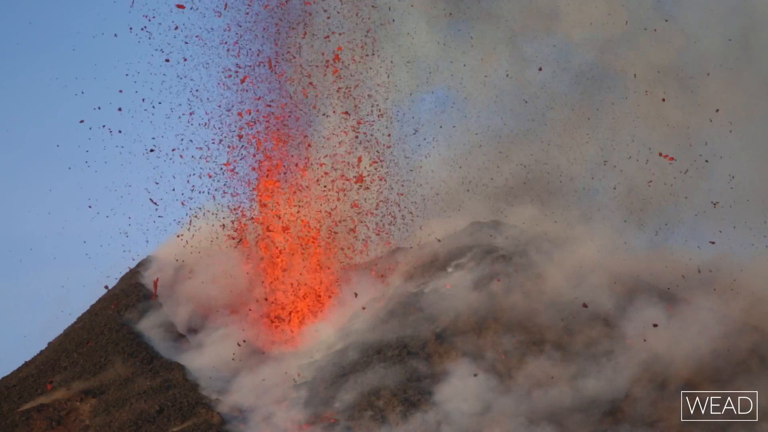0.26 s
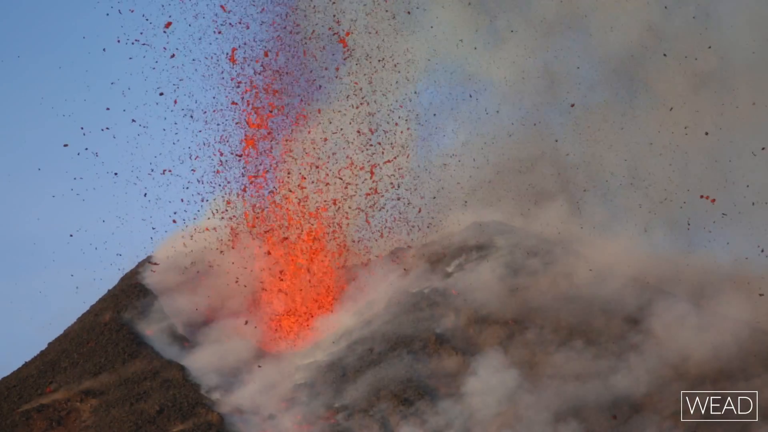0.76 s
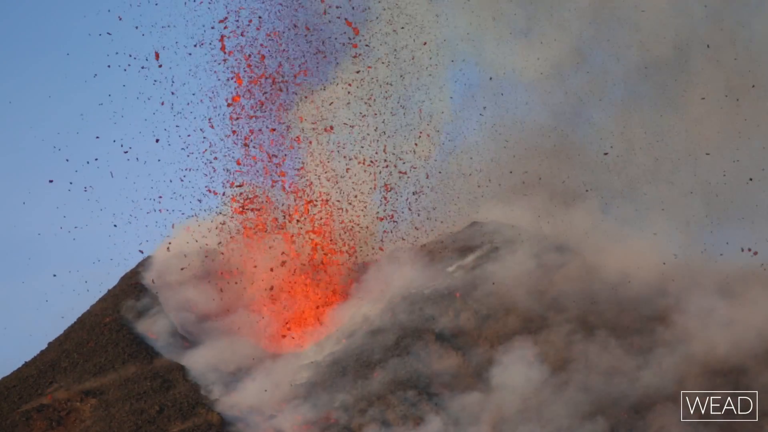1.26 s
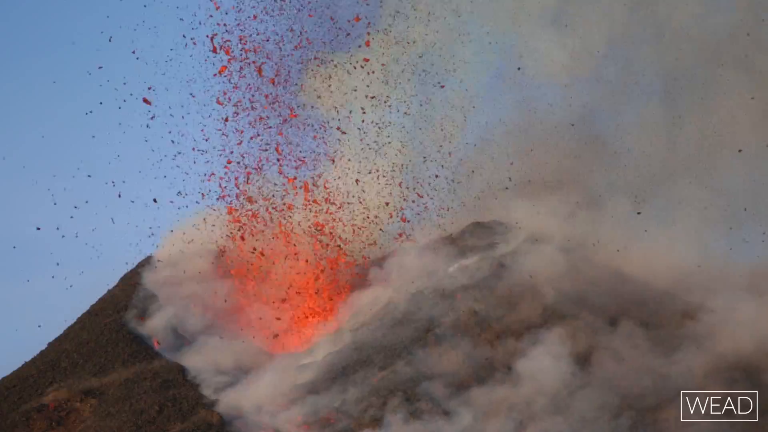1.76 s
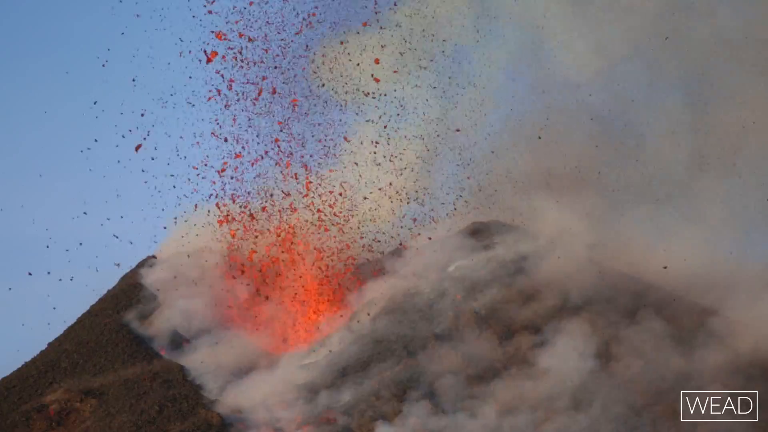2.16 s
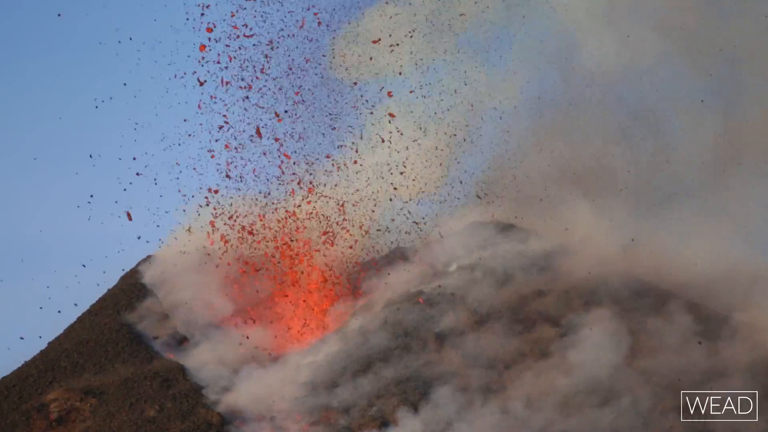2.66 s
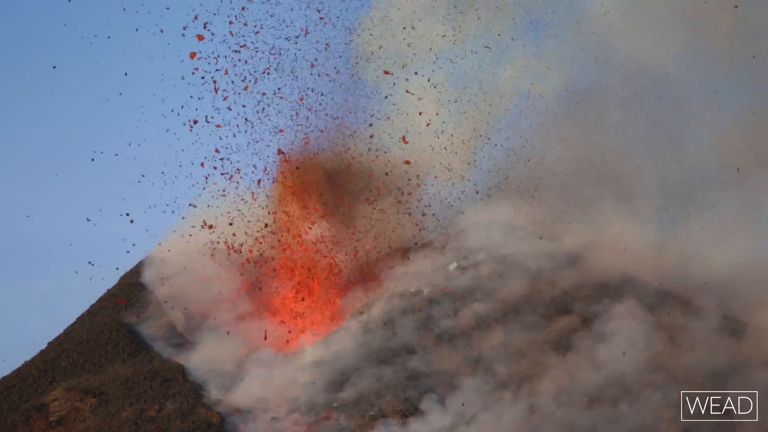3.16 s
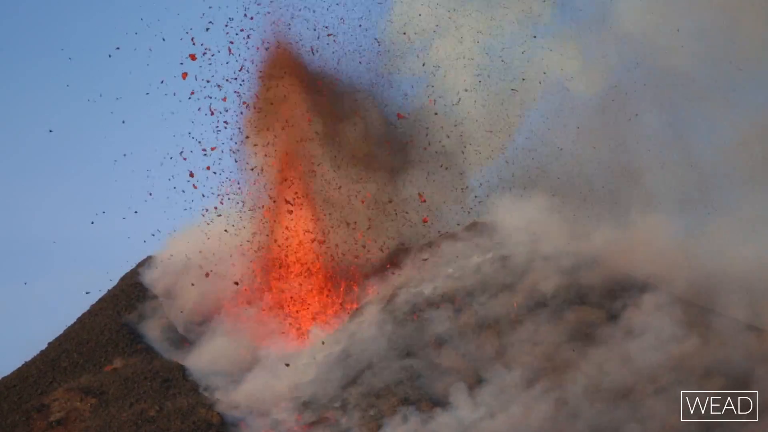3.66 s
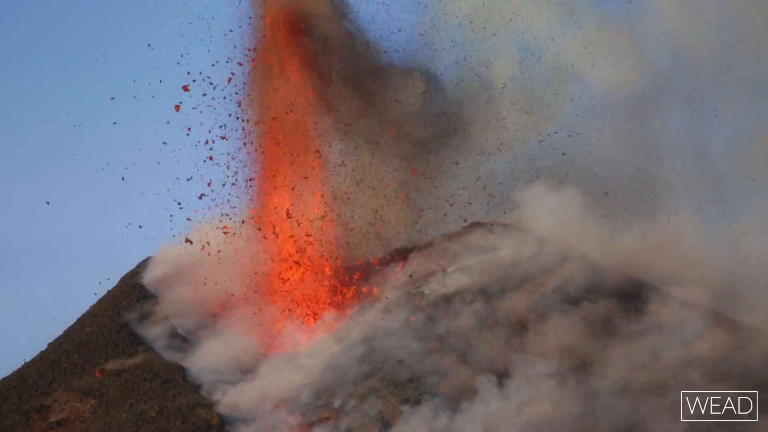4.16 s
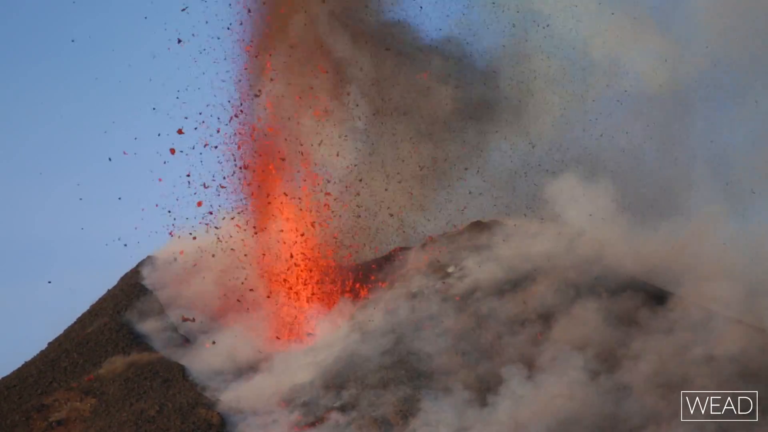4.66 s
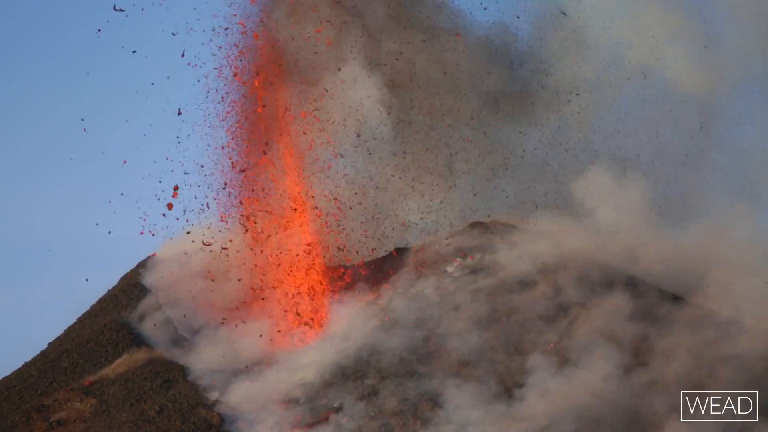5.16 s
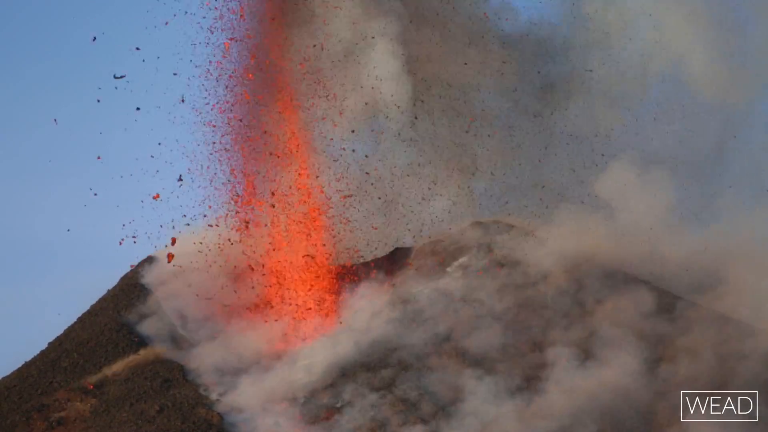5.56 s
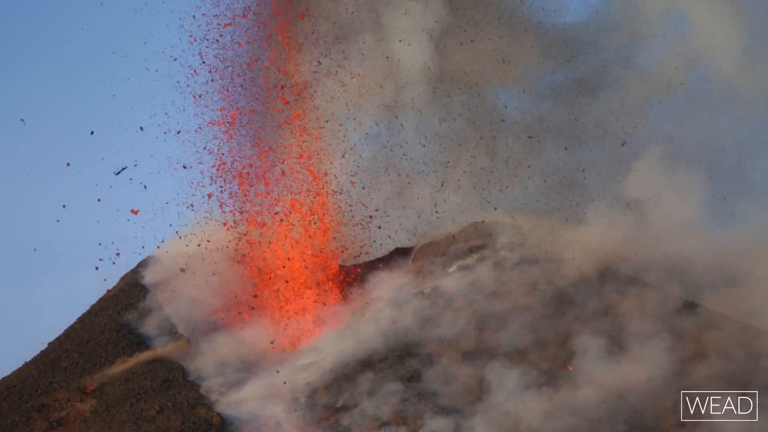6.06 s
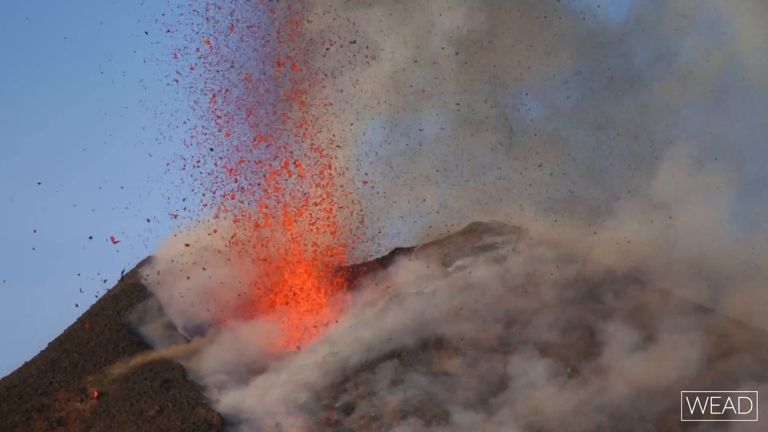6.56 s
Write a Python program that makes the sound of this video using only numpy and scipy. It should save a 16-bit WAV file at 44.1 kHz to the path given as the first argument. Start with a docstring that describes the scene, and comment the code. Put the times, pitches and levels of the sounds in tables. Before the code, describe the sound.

Gas and lava burst from a far crater, quiet booming puffs building to two huge overloaded explosions midway, then fading over deep rumble.

```python
"""Eruption of a volcano's crater

Lava and gas burst from a crater, heard from far across an open mountainside. Gas jets surge as shaped noise:
large eddies boom, small ones roar, and torn lava and ash add spray. Bursting gas slugs add short pressure
swings, and the strongest crests overload the input and crackle. Beneath lie the rumble of the vent, a steady
murmur of air, a thin steady hiss, and a few faint ticks."""
import sys
import numpy as np
from scipy import signal
from scipy.fft import rfft, irfft
from scipy.io import wavfile
from scipy.ndimage import uniform_filter1d

SR = 44100
rng = np.random.default_rng(int(sys.argv[2]) if len(sys.argv) > 2 else 0)


def bounce(signal):
    """Save signal as a 16-bit WAV file at the path given by the first command-line argument."""
    frames = np.transpose(np.atleast_2d(signal))
    limited = np.clip(frames, -1, 1)
    pcm = np.round(limited * 32767).astype(np.int16)
    wavfile.write(sys.argv[1], SR, pcm)


N = 299880
T = np.arange(N) / SR  # time in seconds

# Spectrum of the steady murmur and hiss. Each row: frequency in Hz, relative density in dB per Hz.
AIR_SPECTRUM = [(20, -17), (42, -3), (70, 0), (150, -3.5), (400, -24), (1000, -38), (3000, -36),
                (4500, -44.5), (7000, -46), (13000, -48.5)]
AIR_DB = -53.5  # rms level
# Faint ticks, as of cinders landing nearby.
# Each row: start in seconds, level in dB before the common trim, centre frequency in Hz.
CINDER_TICKS = [(2.4229, -67, 3930), (2.6504, -68, 4500), (2.8779, -66, 4120), (3.0894, -57, 3080),
                (5.7618, -65, 4500), (6.1968, -69, 4400), (6.2766, -68, 5850), (6.5101, -61, 3500)]
# Strength of the churning vent. Each row: time in seconds, level in dB.
CHURN_LEVEL = [(0, -52.5), (0.7, -47.5), (1.36, -34), (1.55, -50), (2.3, -42.5), (3.2, -40), (3.9, -35),
               (4.25, -47.5), (5.2, -51), (6.8, -45)]
# Spectra of the vent's rumble, the spray, the boom and the roar.
# Each row: frequency in Hz, relative density in dB per Hz.
RUMBLE_SPECTRUM = [(20, -21), (45, -3), (70, 2.5), (100, 3.5), (125, -2.5), (170, -5), (400, -39)]
SPRAY_SPECTRUM = [(480, -3.5), (660, 4.5), (830, -5), (1080, -8.5), (1270, -8), (1550, -16), (1950, -18),
                  (2200, -28), (2600, -23), (3150, -25.5), (3550, -43), (4500, -47), (6500, -60),
                  (10000, -81)]
BOOM_SPECTRUM = [(60, -25), (105, -5), (140, -1), (195, 1), (250, -2.5), (320, -8), (500, -29.5)]
ROAR_SPECTRUM = [(150, -28.5), (290, -2.5), (390, 0), (500, -0.5), (570, -2), (660, -3.5), (760, -8),
                 (880, -19), (1080, -26.5), (1270, -29.5), (1600, -41), (2200, -47.5), (3000, -58.5),
                 (3800, -68.5)]
# Surges of gas. Each row: time of full strength in seconds, rise in seconds, hold in seconds,
# roar of small eddies in dB, boom of large eddies in dB, spray in dB.
GAS_SURGES = [(0.234, .046, .02, -50, -47.5, -77), (1.059, 0.073, .11, -31, -36, -35),
              (1.231, 0.072, 0.023, -23, -26.5, -33.5), (1.59, 0.038, .25, -50, -43.5, -47.5),
              (1.889, 0.057, 0.022, -28.5, -30.5, -50), (2.085, .035, 0.024, -37.5, -38, -53.5),
              (2.436, 0.32, 0.39, -50, -46, -58.5), (3.084, 0.24, 0.36, -51.5, -46.5, -56.5),
              (3.471, 0.025, .32, -17.5, -17.5, -54), (3.524, 0.039, 0.032, -12, -21, -52),
              (3.872, 0.05, 0.022, -11.5, -10, -52.5), (4.0, 0.042, 0.19, -25, -19, -56),
              (4.369, .08, .18, -28.5, -25.5, -62.5), (4.686, .04, .06, -37.5, -33.5, -55),
              (5.192, 0.07, 0.018, -38, -33.5, -46), (5.47, 0.1, 0.09, -48, -45.5, -58.5),
              (5.678, 0.084, 0.19, -37, -37, -55), (5.942, 0.057, 0.014, -29, -31, -54),
              (6.117, 0.17, .2, -35.5, -37, -56), (6.37, 0.08, .13, -32.5, -35, -55),
              (6.67, 0.11, 0.095, -43.5, -43.5, -67)]
# Pressure fronts from bursting gas slugs.
# Each row: time of the crest in seconds, peak in dB, centre frequency in Hz.
SLUG_BURSTS = [(1.202, -10.5, 560), (1.251, -11, 560), (1.876, -20.5, 302), (1.896, -17.5, 392),
               (2.09, -23, 348), (2.218, -23, 170), (3.461, -7.5, 450), (3.505, .15, 380),
               (3.520, .35, 420), (3.564, .45, 240), (3.573, 2.6, 300), (3.580, .7, 200), (3.854, .15, 190),
               (3.871, 3.2, 215), (3.876, 3.2, 215), (3.882, .15, 230), (4.023, -2, 186), (4.153, -6, 270),
               (4.483, -9, 220), (4.561, -10, 260), (5.705, -17.5, 400), (5.948, -17.5, 298)]

# Between surges the jet idles.
IDLE_ROAR_DB, IDLE_BOOM_DB, IDLE_SPRAY_DB = -54.5, -48, -60
# After a surge the roar dies fastest, then the boom; the spray stays aloft longest.
ROAR_FALL_DB_PER_S, BOOM_FALL_DB_PER_S, SPRAY_FALL_DB_PER_S = 127, 79.5, 47
# Each surge carries a weaker tail that swells with it but dies more slowly.
TAIL_DB, TAIL_FALL_DB_PER_S = -8, 37.5
EDGE_HZ = 13750  # upper band limit


def gain_of(db):
    """An amplitude ratio is ten to the power of a twentieth of its decibels."""
    return 10 ** (np.asarray(db) / 20)


def evened(x):
    """Division by the root of the mean power gives a signal unit rms."""
    return x / np.sqrt(np.mean(x ** 2) + 1e-20)


def coloured(x, spectrum):
    """A linear filter weights each frequency: here a curve in log frequency with steep outer skirts."""
    f, db = np.transpose(spectrum)
    hz = np.fft.rfftfreq(N, 1 / SR) + 1  # the offset keeps the logarithm finite
    octaves_above = np.log2(np.maximum(hz / f[-1], 1))
    octaves_below = np.log2(np.maximum(f[0] / hz, 1))
    skirt_db = -40 * (octaves_above + octaves_below)
    curve_db = np.interp(np.log(hz), np.log(f), db)
    return evened(irfft(rfft(x) * gain_of(curve_db + skirt_db), N))


def turbulence(spectrum, lumpy_db, steady_s):
    """Turbulent flow makes noise in short lumps whose mean power is steady over longer stretches."""
    lumps = evened(uniform_filter1d(rng.standard_normal(N), size=300))
    lumpy_noise = rng.standard_normal(N) * gain_of(lumpy_db * lumps)
    x = coloured(lumpy_noise, spectrum)
    width = max(int(steady_s * SR), 2)
    power = uniform_filter1d(uniform_filter1d(x ** 2, width), width)
    return x / np.sqrt(abs(power) + 1e-9)


def strength(levels_db, idle_db, fall_db_per_s):
    """Incoherent sources add in power: the idling jet and each surge, which swells, holds and decays."""
    power = np.full(N, gain_of(idle_db) ** 2)
    for (s, rise_s, hold_s, *_), db in zip(GAS_SURGES, levels_db):
        swell = np.exp(-(np.minimum(T - s, 0) / rise_s) ** 2)
        spent_s = np.maximum(T - s - hold_s, 0)
        direct = gain_of(db - fall_db_per_s * spent_s)
        tail = gain_of(db + TAIL_DB - TAIL_FALL_DB_PER_S * spent_s)
        power += swell ** 2 * (direct ** 2 + tail ** 2)
    return np.sqrt(power)


def air_floor():
    """Stationary noise has a fixed spectrum and level: a deep murmur of air and a thin hiss."""
    return gain_of(AIR_DB) * coloured(rng.standard_normal(N), AIR_SPECTRUM)


def ticks(decay_s=0.0039, trim_db=-8):
    """A light impact gives a brief pulse of band noise, rising and decaying around its own pitch."""
    out = np.zeros(N)
    for s, db, hz in CINDER_TICKS:
        age = np.maximum(T - s, 0) / decay_s
        envelope = age * np.exp(1 - age)  # reaches 1 after decay_s
        band = [(hz / 2, -12), (hz * 0.67, -10), (hz, 0), (hz * 1.3, -14)]
        scratch = coloured(rng.standard_normal(N), band)
        out += gain_of(db + trim_db) * envelope * scratch
    return out


def rumble():
    """A churning vent radiates low-frequency turbulence without pause, its level rising and sinking."""
    s, db = np.transpose(CHURN_LEVEL)
    return gain_of(np.interp(T, s, db)) * turbulence(RUMBLE_SPECTRUM, lumpy_db=-1.0, steady_s=0.17)


def spray():
    """Fragmented lava and ash rush upward as broadband noise that follows each surge."""
    *_, spray_db = np.transpose(GAS_SURGES)
    level = strength(spray_db, IDLE_SPRAY_DB, SPRAY_FALL_DB_PER_S)
    return level * turbulence(SPRAY_SPECTRUM, lumpy_db=0.6, steady_s=.06)


def jet(ceiling=0.93):
    """Eddy size sets pitch: large eddies boom, small ones roar; strong peaks wear down on their way."""
    *_, roar_db, boom_db, _ = np.transpose(GAS_SURGES)
    boom_level = strength(boom_db, IDLE_BOOM_DB, BOOM_FALL_DB_PER_S)
    boom = boom_level * turbulence(BOOM_SPECTRUM, lumpy_db=2.5, steady_s=0.055)
    roar_level = strength(roar_db, IDLE_ROAR_DB, ROAR_FALL_DB_PER_S)
    roar = roar_level * turbulence(ROAR_SPECTRUM, lumpy_db=1.5, steady_s=0.045)
    pressure = boom + roar
    limited = pressure / (1 + (pressure / ceiling) ** 4) ** (1 / 4)
    worn = pressure - limited
    # the air swallows the treble of the worn crests, so they stay round
    return pressure - uniform_filter1d(uniform_filter1d(worn, size=25), size=25)


def with_bursts(flow):
    """A front displaces the flow for an instant; distance rounds it to a crest between two troughs."""
    fronts, share = np.zeros(N), np.ones(N)
    for s, db, hz in SLUG_BURSTS:
        near = abs(T - s) < .03
        turns = (T[near] - s) * hz  # cycles from the crest
        window = np.exp(-(turns / .68) ** 2)
        fronts[near] += gain_of(db) * np.cos(2 * np.pi * turns) * window
        share[near] *= 1 - window
    return share * flow + fronts


def scene():
    """Sound pressures superpose: the eruption adds to the steady floor in one channel."""
    background = air_floor() + ticks() + rumble()
    return (background + spray() + with_bursts(jet()))[None]


def record(dry):
    """An overloaded input folds crests beyond full scale back as a crackle; a low-pass limits the band."""
    held = np.clip(dry, -1, 1)
    folded = held - .45 * (dry - held)
    low_pass = signal.firwin(511, EDGE_HZ, window=("kaiser", 9), fs=SR)
    return signal.oaconvolve(folded, low_pass[None], "same")


dry = scene()
out = record(dry)
bounce(out)
```